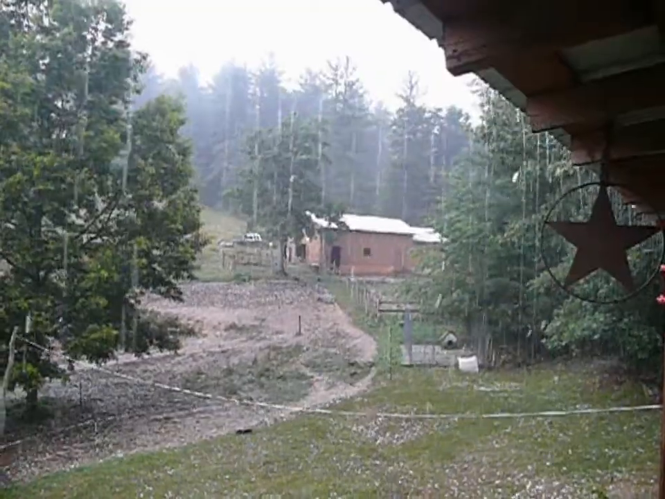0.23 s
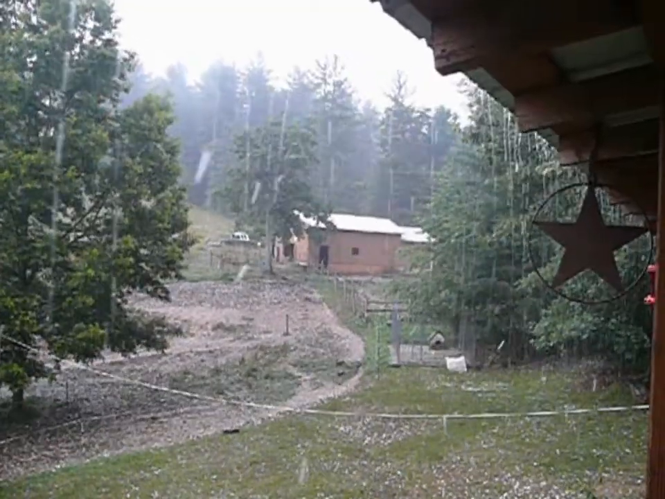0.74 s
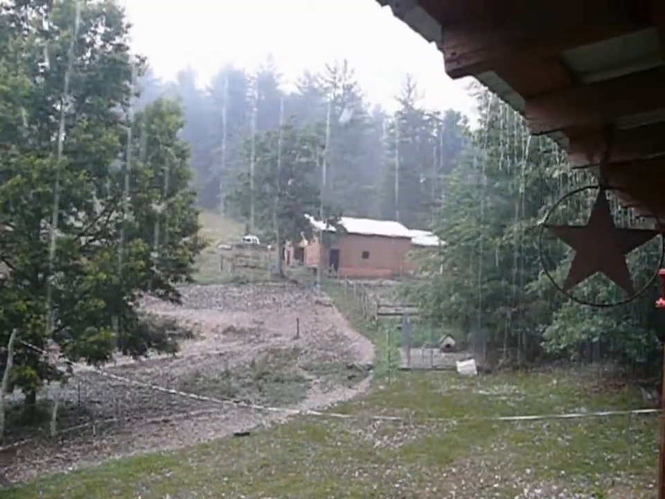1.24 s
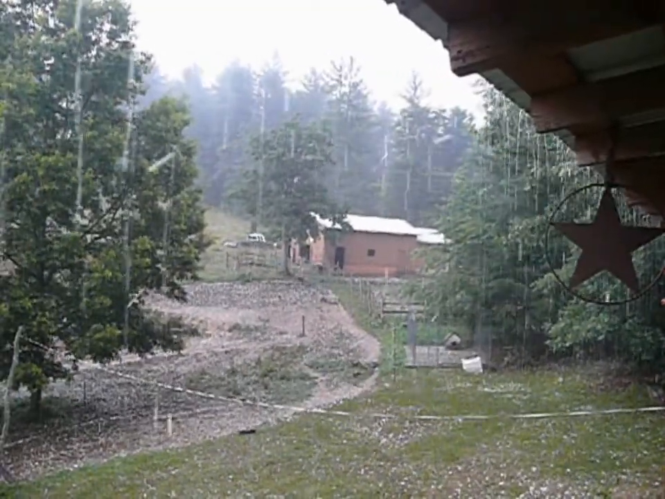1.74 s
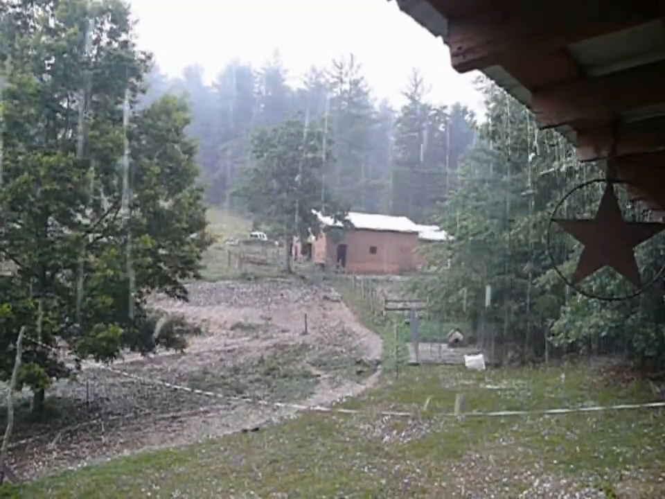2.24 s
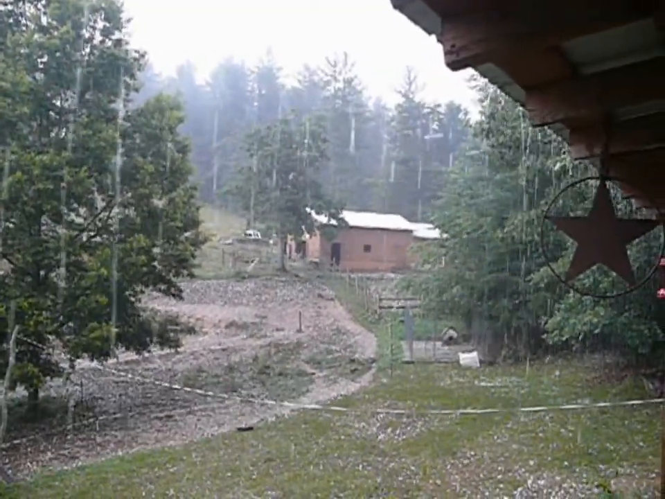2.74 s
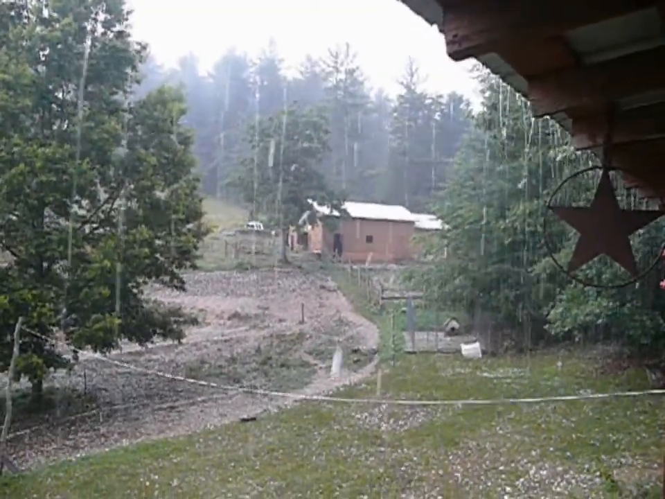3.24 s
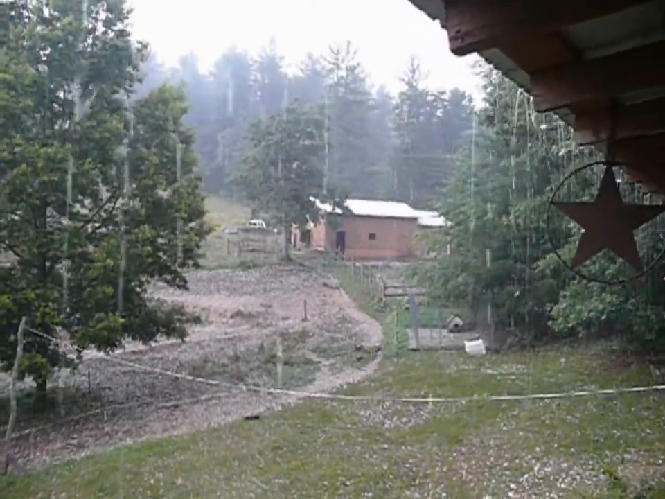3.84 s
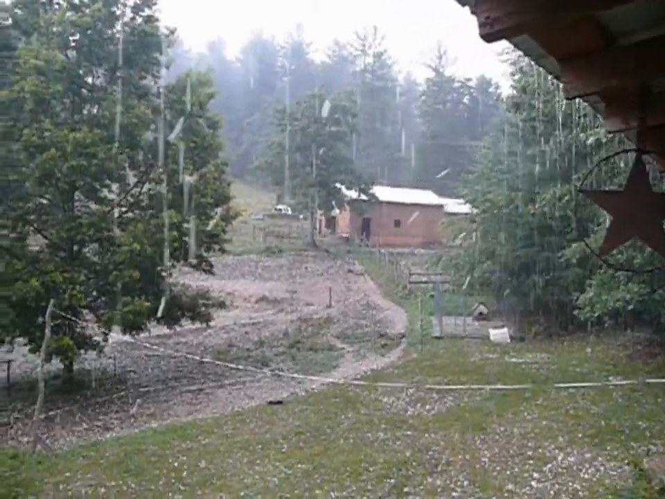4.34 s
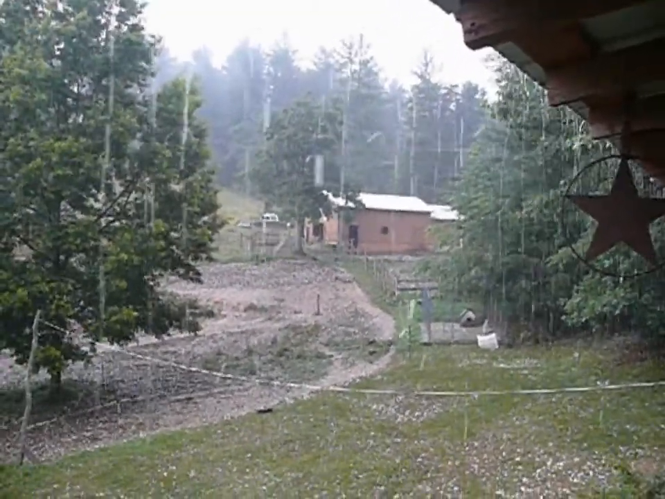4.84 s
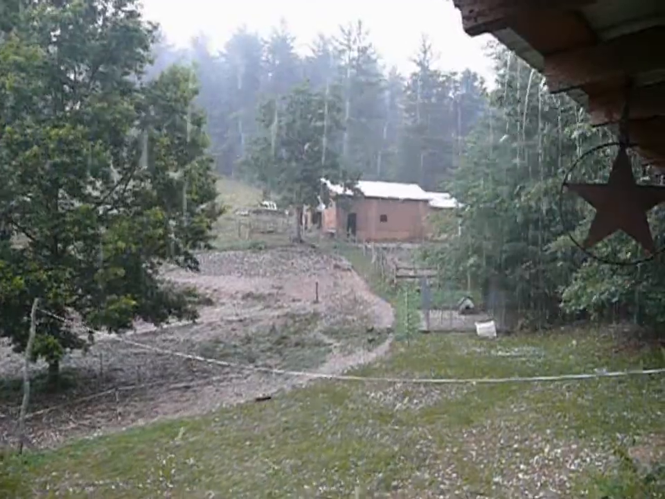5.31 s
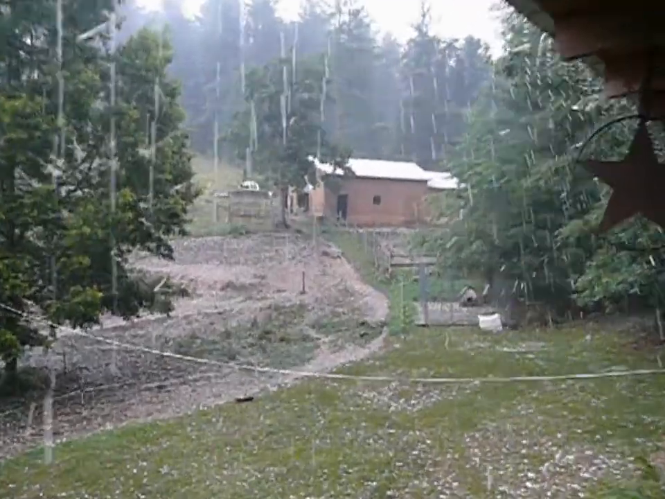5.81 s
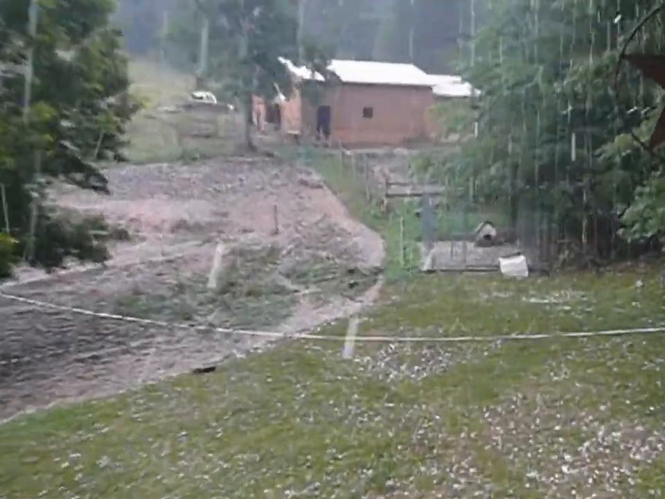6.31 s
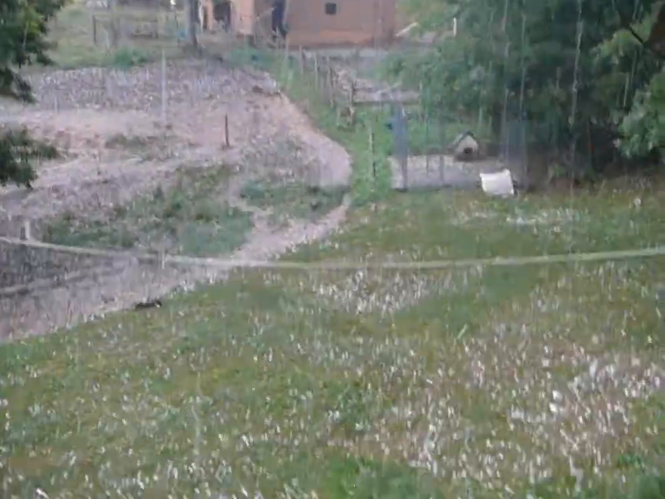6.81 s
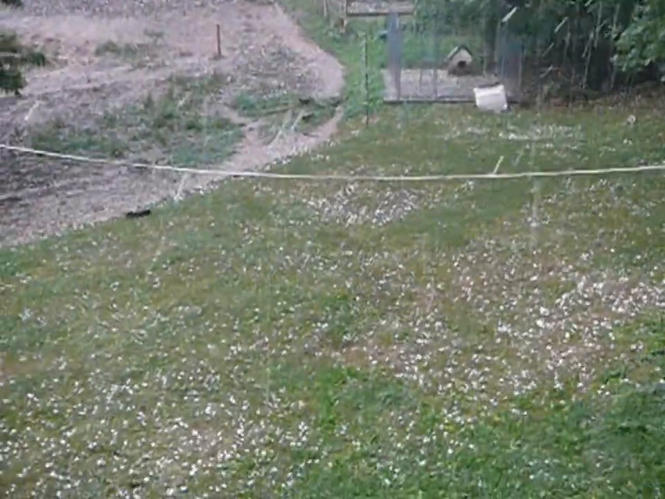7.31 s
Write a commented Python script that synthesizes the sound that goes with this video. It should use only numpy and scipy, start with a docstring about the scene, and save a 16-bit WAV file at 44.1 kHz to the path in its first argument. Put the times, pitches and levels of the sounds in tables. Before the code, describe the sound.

A loud, unbroken clatter of hail comes down on a porch roof just above the microphone. Big stones hit at uneven intervals, some hard and close with a thud or short ping, others lighter and brighter or blurred by distance. Beneath them run a fine patter of small hail and the even rush of the storm on the yard. The sound is strong in the mids, with a thin sizzle on top.

```python
"""Large hailstones strike the sheet roof of a porch, heard from underneath.
Each impact cracks and excites the sheet's many modes, which decay as a brief clatter. Light stones
sound bright, far ones are smeared, and the nearest snap and thump. Small hail patters between them
over the wash of the storm on the yard. A small camera's narrow band limits the treble."""
import sys
import numpy as np
from scipy import signal
from scipy.fft import rfft, irfft, next_fast_len
from scipy.io import wavfile
from scipy.ndimage import map_coordinates

SR = 44100
rng = np.random.default_rng(int(sys.argv[2]) if len(sys.argv) > 2 else 0)


def unload_audio(sound):
    """Save the sound as a 16-bit wav file, at the path given as the first command line argument."""
    columns = np.transpose(np.atleast_2d(sound))
    # keep every value between -1 and 1, then stretch to whole-number steps
    steps = np.round(np.clip(columns, -1, 1) * 32767)
    wavfile.write(sys.argv[1], SR, steps.astype(np.int16))


N = 333396

# impacts of large stones on the roof: start_s, relative_level_db, distance_m
LARGE_STONES = [(.091, -33, 2.1), (.135, -25.5, 3.1), (0.2394, -23, 2.14), (0.29, -20.5, 1.2),
                (0.317, -20.5, 2), (.413, -17.5, 1.42), (.44, -18, 2.4), (.517, -28, 2.5),
                (.905, -21.5, 4.5), (1.043, -27, 4), (1.147, -18, 1.37), (1.326, -33, 2.4),
                (1.358, -21.5, 2), (1.391, -32, 2), (1.466, -23.5, 4.3), (1.603, -33, 0.73),
                (1.672, -19, 2.2), (1.733, -20.5, 2.7), (1.781, -27.5, 1.7), (2.02, -25.5, 2.6),
                (2.109, -23, 1.33), (2.13, -23, 5), (2.23, -23.5, 3.6), (2.357, -21, 2),
                (2.465, -20.5, 6.6), (2.504, -16.5, 6.7), (2.584, -18.5, 3), (2.697, -17, 9.1),
                (2.795, -18.5, 1.7), (2.866, -19, 2.6), (2.939, -27, 4.1), (2.992, -31, 2.4),
                (3.033, -32, 1.4), (3.067, -29, 1.8), (3.19, -20, 1.33), (3.234, -21.5, 11),
                (3.342, -19.5, 2.3), (3.358, -45, 0.84), (3.452, -25, 12), (3.553, -18.5, 3.7),
                (3.63, -23.5, 1.26), (3.686, -21, 0.99), (3.711, -20, 2.2), (4.017, -24, 1),
                (4.121, -21.5, 2.7), (4.218, -26, 3.2), (4.29, -22.5, 3.1), (4.418, -23, 1.8),
                (4.498, -19, 2.5), (4.597, -17, 11), (4.649, -22, 5.2), (4.699, -25.5, 2.3),
                (4.756, -35, 3.6), (4.829, -31.5, 2.5), (4.867, -31.5, 1.9), (4.916, -19.5, 5.7),
                (5.046, -19.5, 5), (5.071, -20, 2.9), (5.158, -23, 2.3), (5.247, -22.5, 4.4),
                (5.292, -23, 3), (5.33, -27.5, 1.27), (5.378, -31, 1.4), (5.465, -23.5, 1.6),
                (5.537, -18.5, 1.74), (5.608, -21, 4.1), (5.7, -21.5, 2), (5.754, -26.5, 1.2),
                (5.798, -17.5, 2.8), (5.85, -21.5, 5.4), (5.929, -20, 8.2), (6.001, -21.5, 2.6),
                (6.075, -21.5, 1.03), (6.1, -26.5, 0.81), (6.151, -33, 0.87), (6.2, -20.5, 1.6),
                (6.394, -30.5, 7.4), (6.473, -31, 0.78), (6.518, -19, 1.9), (6.58, -20.5, 3.6),
                (6.653, -26, 3.8), (6.728, -27, 1.3), (6.791, -17, 3.6), (6.834, -23.5, 18),
                (6.931, -24, 2.2), (6.984, -31, 1.1), (7.061, -20.5, 15), (7.153, -20, 5.7),
                (7.221, -26.5, 14), (7.275, -28.5, 1.35), (7.302, -20.5, 2.9), (7.327, -16.5, 12),
                (7.462, -22, 3.3), (7.532, -16, 2.7)]
# stiff spots of the roof that ring under a blow: start_s, level_db, pitch_hz, t60_s
STIFF_SPOTS = [(0.293, -25, 3040, 0.2), (.42, -30.5, 292, 0.22), (.91, -30.5, 556, 0.11),
               (1.1474, -5, 720, 0.0085), (2.15, -26, 1024, 0.56), (2.59, -22, 647, .09),
               (2.873, -30.5, 470, 0.22), (3.194, -20.5, 3650, 0.23), (3.362, -30, 351, 0.19),
               (3.713, -17, 930, 0.041), (4.296, -34, 315, 0.18), (4.7003, -10, 2430, 0.015),
               (4.705, -25, 2740, 0.24), (5.54, -19, 1470, .035), (5.804, -20, 1710, .09),
               (7.33, -29.5, 391, .2)]
# close, hard hits that come with an extra low thump: start_s, level_db
LOW_THUMPS = [(.413, -40), (1.1466, -21), (2.109, -40), (3.19, -40), (3.687, -35), (4.7002, -28),
              (6.0755, -33)]
# spectrum of the struck sheet: frequency_hz, relative_level_db
SHEET_SPECTRUM = [(30, -30), (70, -36), (140, -16.5), (270, -7.5), (480, -8), (590, -8.5), (820, -3.5),
                  (1000, 2.5), (1500, -0.5), (2250, 0), (2750, -3), (3450, -0.5), (7000, -15)]
# decay time of the sheet's modes: frequency_hz, t60_s
SHEET_DECAY = [(100, 1), (300, 0.4), (900, 0.37), (2500, .29), (6000, 0.28)]
# spectrum of hard ice meeting the sheet: frequency_hz, relative_level_db
SNAP_SPECTRUM = [(100, -10), (500, -1.5), (1200, -8), (2500, -2), (4500, -5), (7000, -10)]
# spectrum of hail on grass and trees: frequency_hz, relative_level_db
YARD_SPECTRUM = [(30, -23), (100, -11), (250, -1.5), (600, 0), (1000, 3), (2200, 0.5), (3400, -2.5),
                 (5000, -4.5), (7000, -28.5)]
# how heavily the small hail falls on roof and yard: time_s, gain_db
FALL_STRENGTH = [(0, 1), (.65, -1), (1.3, 0.3), (2.8, 2), (3.9, -0.5), (4.5, 1), (5.8, 2), (7.56, 1)]
# microphone response with the camera's steep upper edge: frequency_hz, gain_db
MIC_RESPONSE = [(1000, 2), (2000, 2), (3000, 4), (3450, 4), (3650, 3.5), (3900, -3), (4300, -17),
                (5000, -46)]

ORDINARY_DB = -20.5  # a stone listed at this level has no treble tilt


def large_stones(gain_db=-3.0, treble_db_per_db=0.43, bass_scatter_db=1.35,
                 panel_hz=1786, panel_spread_oct=0.46):
    """Contact time sets bandwidth: lighter stones touch the sheet more briefly and sound brighter."""
    roof = np.zeros(N)
    hz = np.fft.rfftfreq(SR // 3, 1 / SR)
    scatter = rng.standard_normal((len(LARGE_STONES), 2))
    for (start_s, db, distance_m), (bass, tuning) in zip(LARGE_STONES, scatter):
        treble_db = treble_db_per_db * (ORDINARY_DB - db)
        tilt_db = along([(480, bass_scatter_db * bass), (780, 0), (1100, 0), (3500, treble_db)], hz)
        centre_hz = panel_hz * 2 ** (panel_spread_oct * tuning)  # each stone hits its own panel
        spectrum = rfft(impact(distance_m)) * amp(tilt_db) * panel(hz, centre_hz)
        add(roof, start_s, amp(db + gain_db) * irfft(spectrum))
    return colour(roof, SHEET_SPECTRUM, keep_power=True)


def impact(distance_m, rise_s_per_m=0.0031, crack_db=4, crack_t60=0.085, rattle_db=2, rattle_hz=520):
    """Spreading weakens the crack with distance; bending-wave dispersion slows the clatter's rise."""
    t = np.arange(SR // 3) / SR
    distance_m = max(distance_m, 1)
    crack = amp(crack_db) / distance_m * fade(t, crack_t60) * rng.standard_normal(len(t))
    body = (1 - np.exp(-t / (rise_s_per_m * distance_m))) * clatter()
    # reflections from ribs and rafters arrive in uneven clumps
    knots = rng.standard_normal(len(t) // 10)
    clumps_db = rattle_db * np.interp(t * rattle_hz, np.arange(len(knots)), knots)
    return (crack + body) * unit(amp(clumps_db))


def clatter(window=256):
    """Dense modes merge into noise; frequency-dependent damping lets the low bands ring longest."""
    hz, t, bands = signal.stft(rng.standard_normal(SR // 3), SR, nperseg=window)
    damped = bands * fade(t, along(SHEET_DECAY, hz)[:, None])
    return signal.istft(damped, SR, nperseg=window)[1][:SR // 3]


def panel(hz, centre_hz, width_hz=220, broad_db=-1, narrow_width_hz=35, count=7):
    """Modal superposition: one broad resonance and a few narrow ones colour the mids."""
    centres_hz = np.exp(rng.uniform(np.log(330), np.log(3700), count))
    narrow = sum(resonance(hz, mode_hz, narrow_width_hz) for mode_hz in centres_hz)
    return 1 + amp(broad_db) * resonance(hz, centre_hz, width_hz) + narrow


def resonance(hz, centre_hz, width_hz):
    """A damped oscillator responds most at its natural frequency, here with a gain of 1."""
    return 1j * hz * width_hz / (centre_hz ** 2 - hz ** 2 + 1j * hz * width_hz)


def snaps_and_thumps(snap_db=7.5, snap_t60=0.016, thump_db=-17.5, thump_db_per_db=1.5,
                     pulse_s=0.0011, loss_db_per_doubling=16):
    """Impact transients: close hits come with a snap and a low thump that fall steeply with distance."""
    thumps, snaps = np.zeros(N), np.zeros(N)
    t = np.arange(SR // 4) / SR
    age = t / pulse_s
    pulse = age * (2 - age) * np.exp(-age)
    pulse /= pulse.max()
    for start_s, db, distance_m in LARGE_STONES:
        near_db = db - loss_db_per_doubling * np.log2(max(distance_m, 1))
        weight_db = thump_db_per_db * (db - ORDINARY_DB)  # heavy stones thump louder
        add(snaps, start_s, amp(near_db + snap_db) * fade(t, snap_t60) * rng.standard_normal(len(t)))
        add(thumps, start_s, amp(near_db + thump_db + weight_db) * pulse)
    for start_s, db in LOW_THUMPS:
        add(thumps, start_s, amp(db) * pulse)
    return thumps + colour(snaps, SNAP_SPECTRUM, keep_power=True)


def stiff_spots(detune=0.033, count=3):
    """Free vibration: a struck stiff spot rings in a few close modes that beat as they decay."""
    roof, t = np.zeros(N), np.arange(SR // 4) / SR
    for start_s, db, pitch_hz, t60 in STIFF_SPOTS:
        modes_hz = pitch_hz * np.exp(detune * rng.standard_normal((count, 1)))
        ring = np.cos(2 * np.pi * modes_hz * t).mean(axis=0)
        add(roof, start_s, amp(db) * fade(t, t60) * ring)
    return roof


def small_hail(level_db=-41, spread_db=16, tick_t60=0.076, ring_db=-6, ring_t60=0.71, count=600):
    """Shot noise: small stones land at independent random times, each a tick with a longer tail."""
    roof, t = np.zeros(N), np.arange(SR // 4) / SR
    envelope = fade(t, tick_t60) + amp(ring_db) * fade(t, ring_t60)
    for when, strength in rng.uniform(0, 1, (count, 2)):
        add(roof, when * N / SR, amp(spread_db * strength) * envelope * rng.standard_normal(len(t)))
    return amp(level_db) * unit(colour(roof, SHEET_SPECTRUM))


def yard_wash(level_db=-43):
    """Incoherent summation: countless distant impacts on grass and trees merge into steady noise."""
    return amp(level_db) * unit(colour(rng.standard_normal(N), YARD_SPECTRUM))


def amp(db):
    """Amplitude grows tenfold for every 20 dB."""
    return 10 ** (np.asarray(db) / 20)


def unit(x):
    """Normalisation to an rms of 1."""
    return x / np.sqrt(np.mean(x ** 2) + 1e-20)


def along(points, hz):
    """Interpolation of (frequency_hz, value) points on a logarithmic frequency axis."""
    points_hz, values = np.transpose(points)
    return np.interp(np.log(hz + 1), np.log(points_hz), values)


def fade(t, t60):
    """Exponential decay, 60 dB in t60 seconds."""
    return np.exp(-np.log(1000) * t / t60)


def add(track, start_s, sound):
    """Linear superposition of a sound on the track from start_s on."""
    start = int(np.clip(round(start_s * SR), 0, N - 1))
    track[start:start + len(sound)] += sound[:N - start]


def colour(x, points, keep_power=False):
    """Minimum-phase filter through (frequency_hz, gain_db); keep_power holds white noise's level."""
    size = 2 * next_fast_len(N // 2 + SR // 4)
    gain = amp(along(points, np.fft.rfftfreq(size, 1 / SR)))
    cepstrum = irfft(np.log(unit(gain) if keep_power else gain))
    cepstrum[1:size // 2] *= 2  # folding onto positive time makes the filter causal
    cepstrum[size // 2 + 1:] = 0
    return irfft(rfft(x, size) * np.exp(rfft(cepstrum)), size)[:N]


def cubic_join(samples, positions):
    """Lagrange interpolation on the cubic through the nearest four samples."""
    whole, part = np.floor(positions).astype(int), positions % 1
    nodes = range(-1, 3)
    weight = lambda k: np.prod([(part - j) / (k - j) for j in nodes if j != k], axis=0)
    return sum(weight(k) * samples.take(whole + k, mode="clip") for k in nodes)


def scene():
    """Sound pressures add at one microphone; patter and wash ease and swell together."""
    strikes = large_stones() + snaps_and_thumps() + stiff_spots()
    fall_db = np.interp(np.arange(N) / SR, *np.transpose(FALL_STRENGTH))
    return (strikes + amp(fall_db) * (small_hail() + yard_wash()))[None]


def record(dry, ceiling=0.36, sample_rate_hz=8000, top_hz=15850, dc_offset=-0.0139):
    """Saturation and sampling: the camera rounds off peaks, samples coarsely and sits just off zero."""
    heard = colour(dry[0], MIC_RESPONSE)
    limited = heard / (1 + (heard / ceiling) ** 8) ** (1 / 8)
    coarse = map_coordinates(limited, [np.arange(0, N, SR / sample_rate_hz)], order=3)
    # spectral imaging: joining the coarse samples mirrors the mids into the treble as a thin sizzle
    joined = cubic_join(coarse, np.arange(N) * sample_rate_hz / SR)
    low_pass = signal.ellip(12, .2, 70, top_hz, fs=SR, output="sos")
    return signal.sosfilt(low_pass, joined)[None] + dc_offset


dry = scene()
out = record(dry)
unload_audio(out)
```